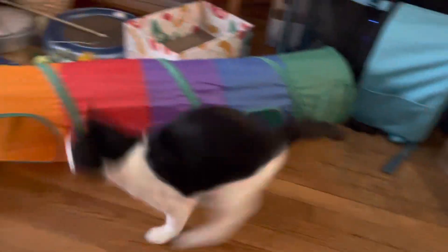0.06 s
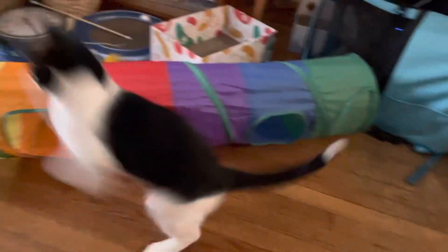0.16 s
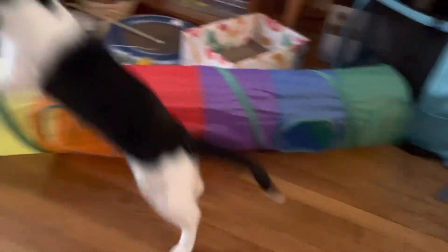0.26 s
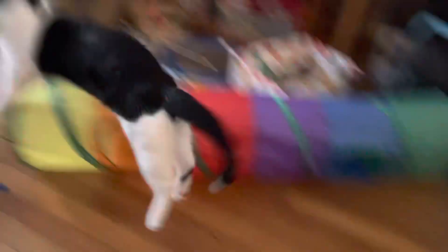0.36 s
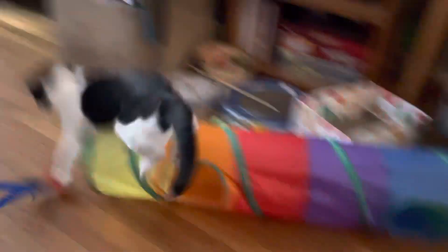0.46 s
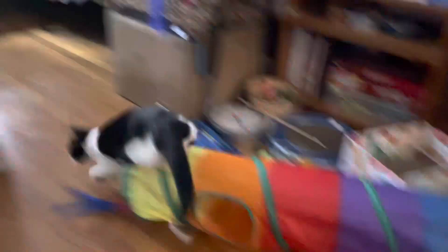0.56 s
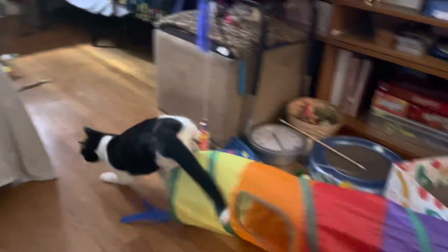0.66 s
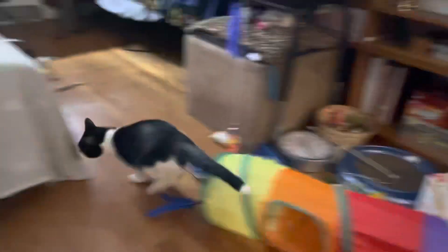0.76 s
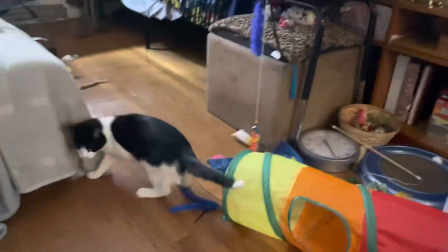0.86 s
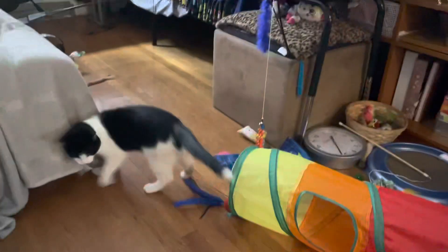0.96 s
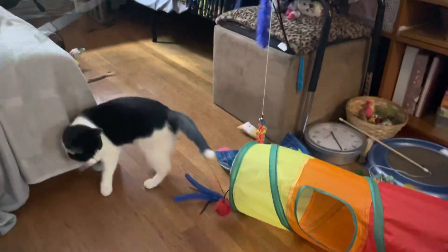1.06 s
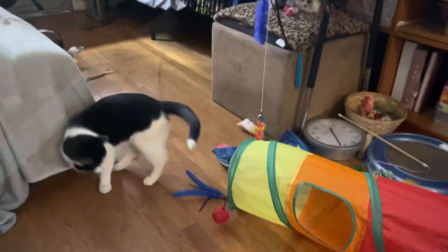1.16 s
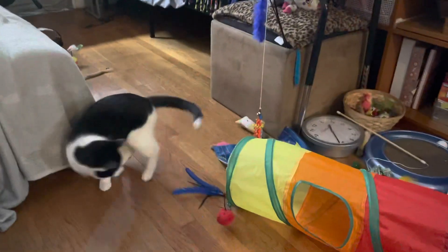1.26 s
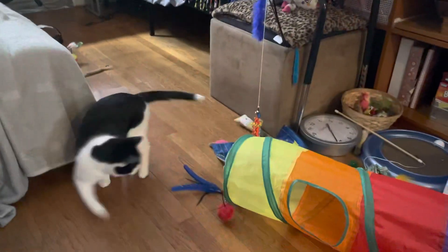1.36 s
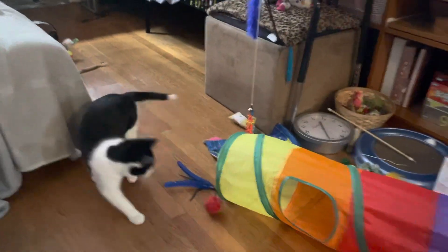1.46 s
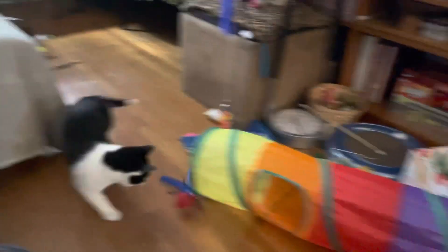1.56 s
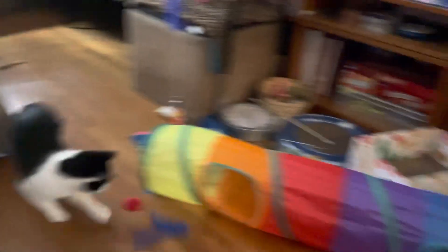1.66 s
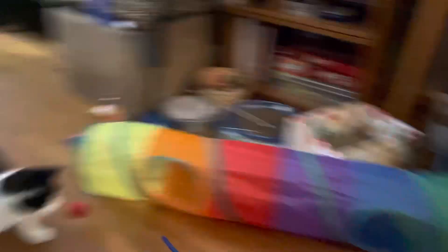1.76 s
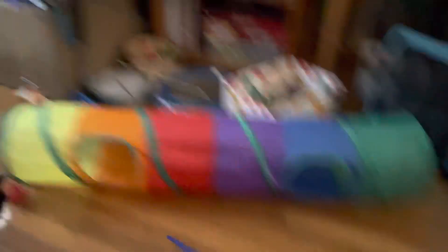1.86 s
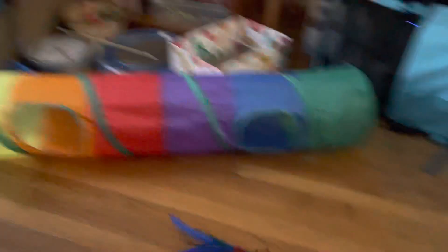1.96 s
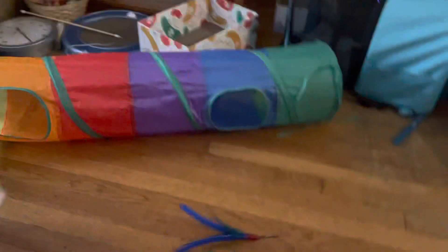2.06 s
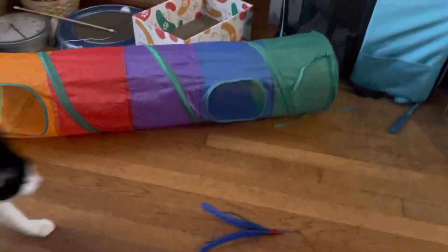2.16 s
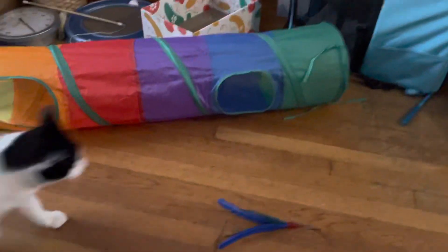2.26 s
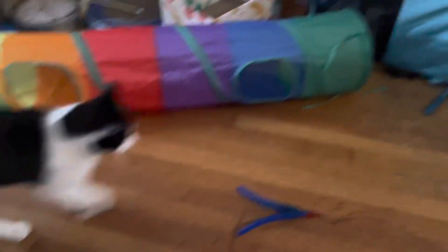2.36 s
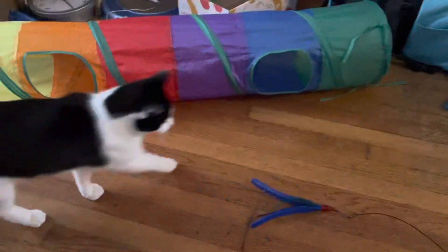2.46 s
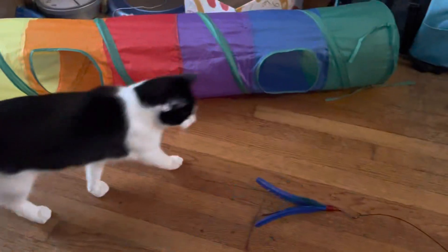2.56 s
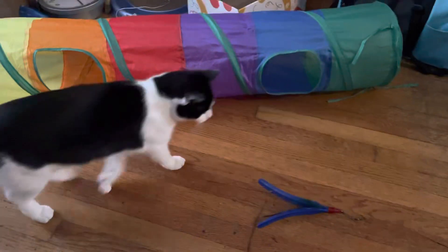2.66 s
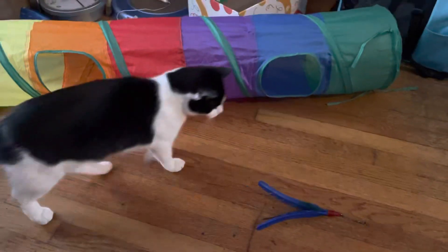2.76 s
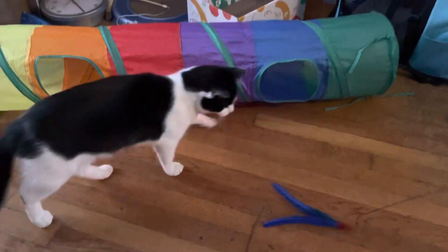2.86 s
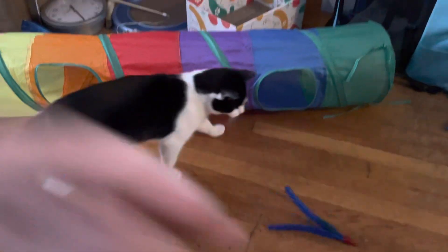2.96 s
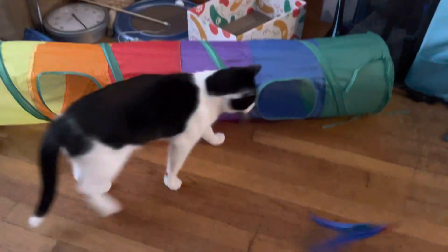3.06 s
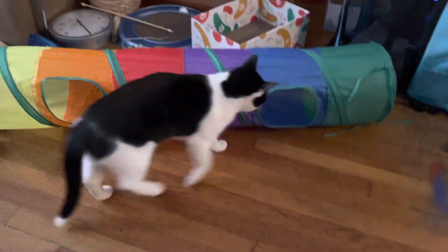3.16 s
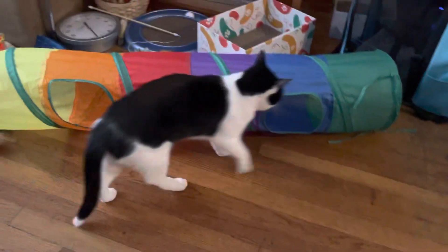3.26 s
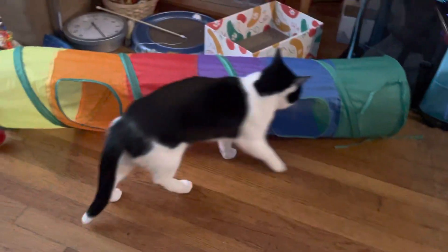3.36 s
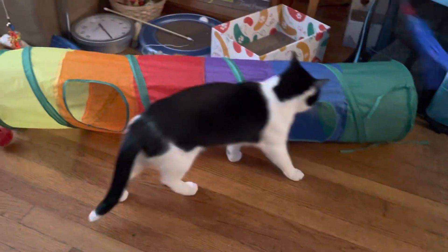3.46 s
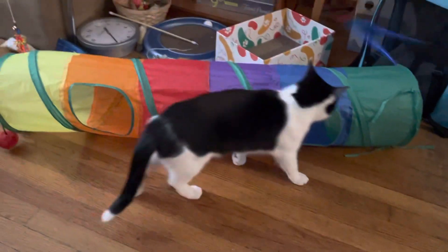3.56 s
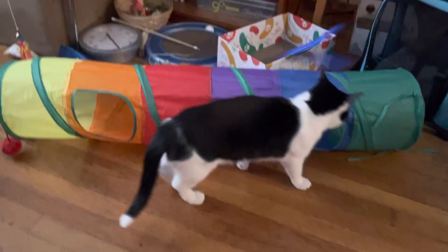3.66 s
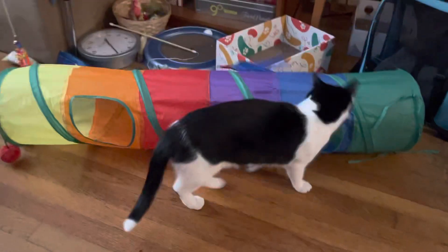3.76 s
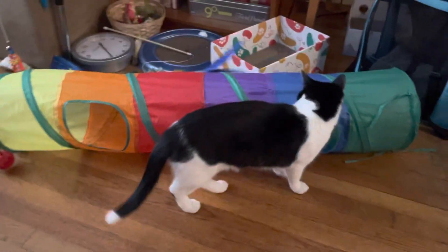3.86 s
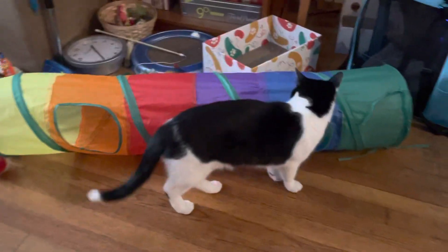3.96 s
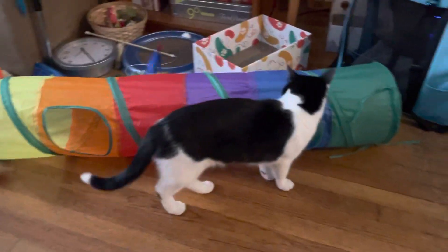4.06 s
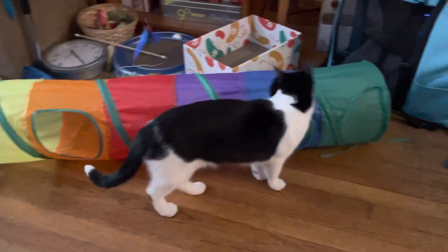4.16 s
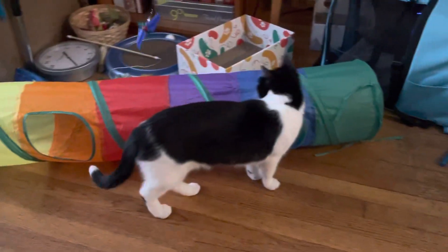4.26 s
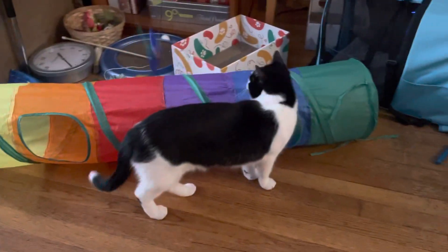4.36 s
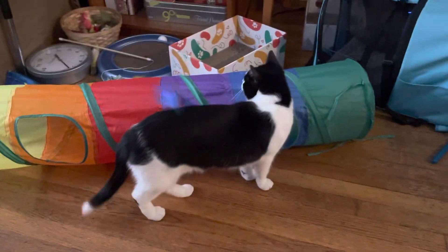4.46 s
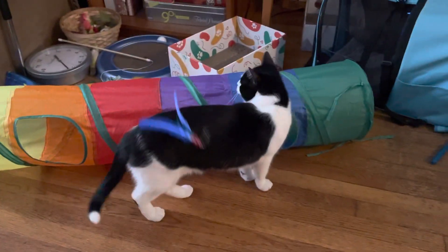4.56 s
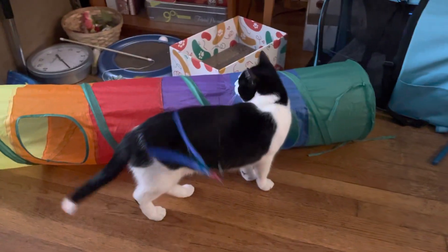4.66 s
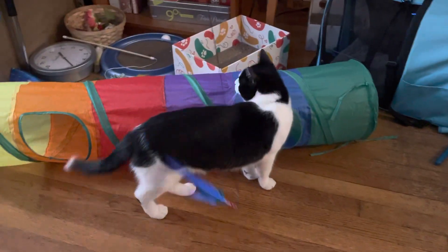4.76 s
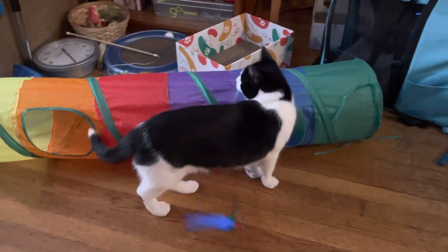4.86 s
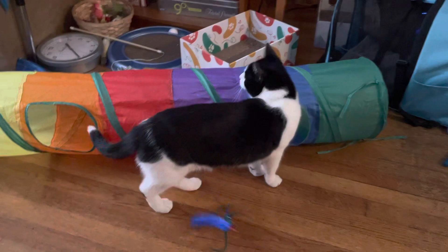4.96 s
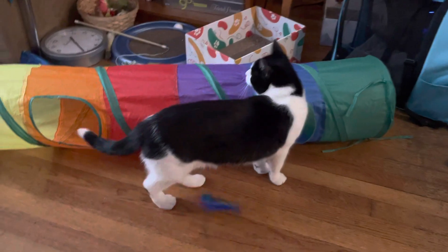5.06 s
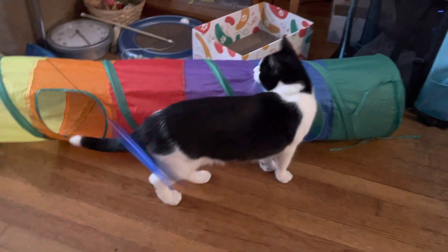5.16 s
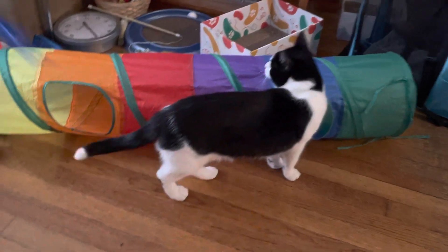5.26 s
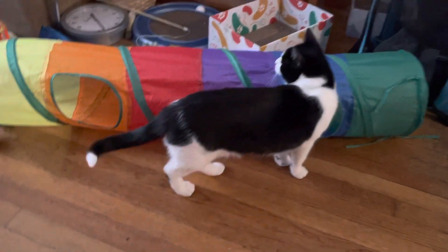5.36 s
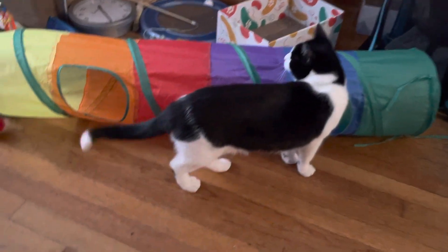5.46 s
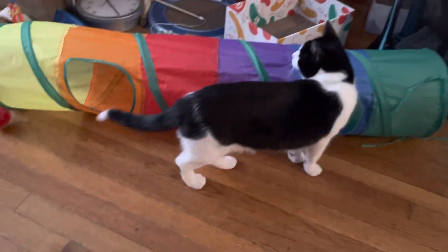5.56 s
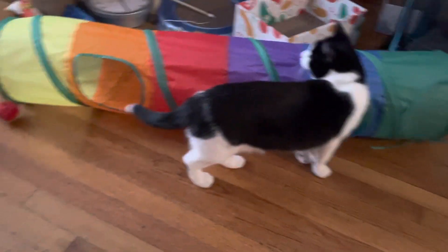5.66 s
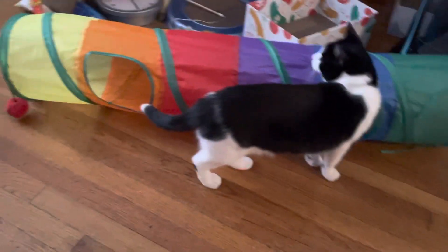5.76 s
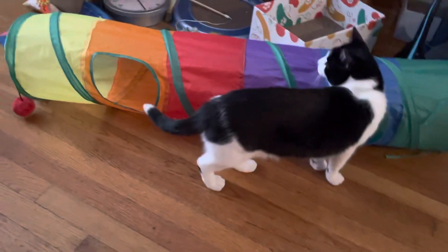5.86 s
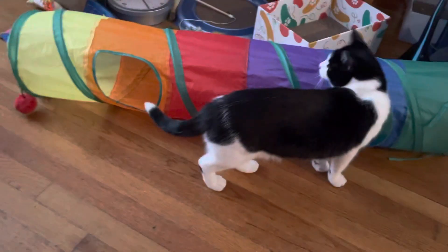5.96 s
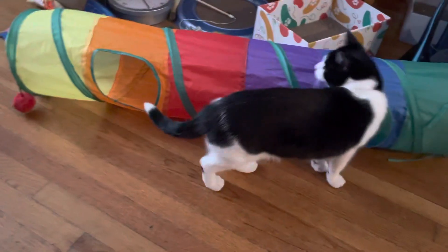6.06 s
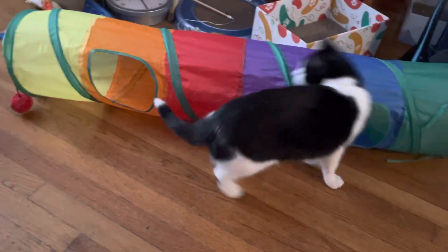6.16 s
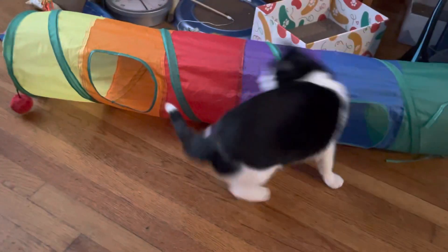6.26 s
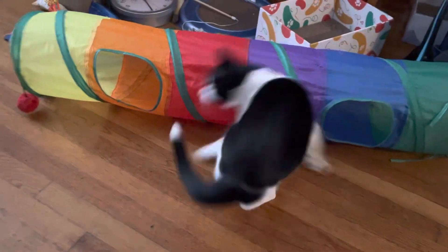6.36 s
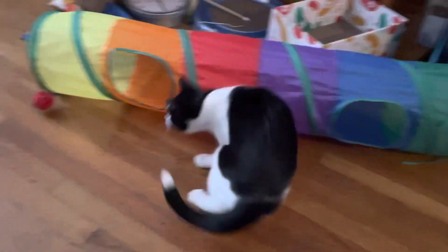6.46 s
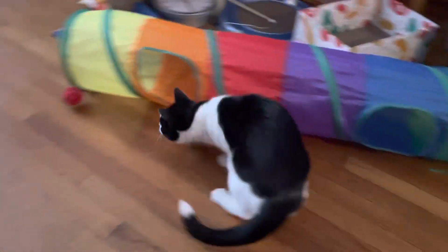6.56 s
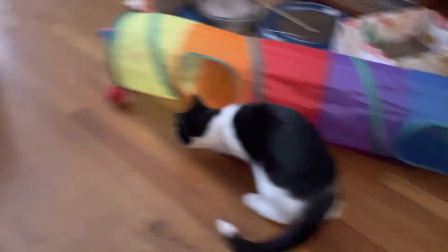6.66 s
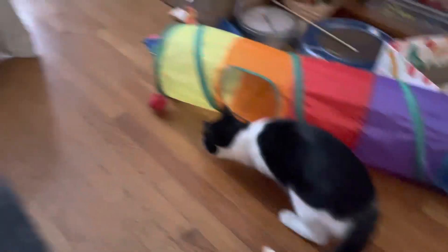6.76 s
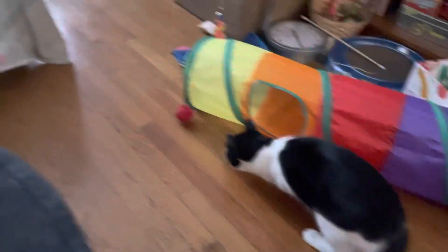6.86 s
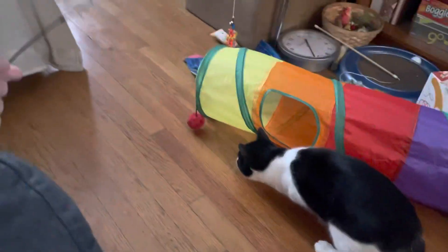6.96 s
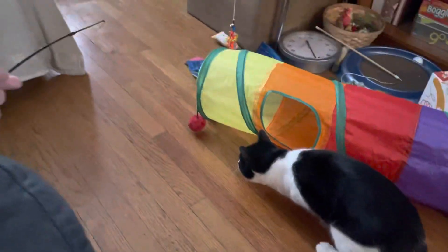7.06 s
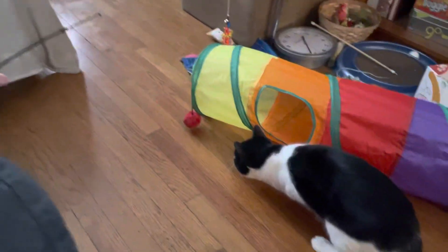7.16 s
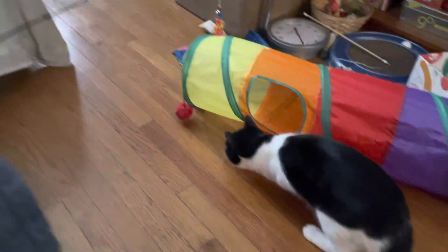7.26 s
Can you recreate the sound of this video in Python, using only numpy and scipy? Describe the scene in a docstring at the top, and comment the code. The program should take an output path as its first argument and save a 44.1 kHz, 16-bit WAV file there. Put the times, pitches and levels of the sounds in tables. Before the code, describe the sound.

A cat scampers and pounces on a hardwood floor, with sharp claw clicks, soft paw thumps and faint swishes.

```python
"""Sharp ticks and soft thumps on a hardwood floor: a cat trots and pounces after a flicked feather toy.
Claws and toy ring briefly on the boards and skid; padded paws push the boards, which ring and rattle.
Fur, feathers and a nylon play tunnel scuff and swish. A low room hum lies underneath.
Heard close; some treble bands sound wide and cancel in the centre."""
import sys
import numpy as np
from scipy import signal
from scipy.fft import rfft, irfft, next_fast_len
from scipy.io import wavfile
from scipy.ndimage import uniform_filter1d

SR = 44100
rng = np.random.default_rng(int(sys.argv[2]) if len(sys.argv) > 2 else 0)


def unload_audio(sound):
    """Save the sound as a 16-bit wav file, at the path given as the first command line argument."""
    columns = np.transpose(np.atleast_2d(sound))
    # keep every value between -1 and 1, then stretch to whole-number steps
    steps = np.round(np.clip(columns, -1, 1) * 32767)
    wavfile.write(sys.argv[1], SR, steps.astype(np.int16))


N = 322812

# claw and toy hits: start_s, level_db, low_note_hz, upper_re_low_db, knock_re_tip_db, skid_db, skid_t60_s
TICKS = [(0.125, -42, 2080, -11, -7, -52, 0.2), (0.203, -45, 2070, 6, -18, -60, .14),
         (0.2608, -32, 2300, 6.5, -10, -53, 0.28), (0.49, -15.5, 2370, -27, -6, -33.5, 0.4),
         (0.5834, -22, 2620, -32, -8.5, -44, 0.31), (0.621, -46, 2180, 16, -7, -42, 1),
         (0.6848, -33.5, 1440, -6, 8, -41, 0.29), (0.6875, -37.5, 1450, -2, -3, -60, 0.092),
         (0.8802, -39, 1540, -9.5, 7.5, -40, 0.13), (0.9014, -36, 1850, -7, 1, -61, 0.23),
         (0.9715, -47, 2290, 1, 4, -60, .05), (1.0114, -50, 1820, 0, 5.5, -78, .05),
         (1.15, -52.5, 2220, -7, 11, -71, 0.46), (1.173, -63, 2620, -2.5, 15, -55.5, 0.15),
         (1.2103, -63, 1890, 10, 19, -66, 0.61), (1.29, -33.5, 3400, 27, -5.5, -53.5, 0.14),
         (1.3457, -55.5, 2400, -3.5, 13, -51.5, 0.19), (1.4952, -26, 2650, -2.5, -2, -43, 0.2),
         (1.712, -56, 2700, 0, 13, -47.5, 0.021), (1.7573, -26.5, 3000, 9, 12.5, -33.5, 0.047),
         (1.7596, -21, 1602, 1, -4.5, -32.5, 0.28), (1.802, -48, 3207, 12, -15, -50, 0.05),
         (1.844, -36, 2110, 5, -3, -52, 0.54), (2.0219, -57.5, 1830, -1, 24.5, -55, 0.96),
         (2.068, -36.5, 3240, 9.5, -10, -73, 0.027), (2.2458, -45.5, 2250, 2.5, -6, -65, 0.65),
         (2.3177, -45.5, 2190, 2, 1.5, -62, 0.23), (2.354, -37.5, 3410, 25, -24, -54.5, 0.037),
         (2.724, -59, 2160, -3, -3, -83, 0.034), (2.7818, -28.5, 2340, 2, -26, -47, 0.039),
         (2.917, -61.5, 1920, 1, 32, -78, 0.17), (2.9309, -61, 1960, -6, 20, -50.5, 0.3),
         (2.98, -55, 1900, 1.5, 13, -68, .04), (3.014, -52, 2680, 18.5, 5, -64, 0.07),
         (3.7207, -59.5, 1690, -3.5, 19, -51, 0.37), (3.747, -51, 1660, -7, 9.5, -50, 0.22),
         (3.7525, -40, 1530, -9, 1.5, -57, 0.16), (3.7565, -49, 1400, -6.5, 12, -69, 0.12),
         (4.0537, -68, 1736, 8, -7.5, -67.5, .15), (4.8615, -28.5, 2130, -3, -2.5, -34.5, 0.037),
         (4.8714, -26, 2860, 8.5, -20.5, -45.5, 0.19), (4.916, -46, 2420, -5.5, 3.5, -48.5, 0.041),
         (4.9217, -39.5, 2570, 17, -12.5, -58, 0.077), (4.973, -48, 2080, 19, 5, -59, 0.079),
         (6.0376, -31, 3650, -11, 1, -50, 0.079), (6.041, -28, 3750, -2, -5.5, -38.5, 0.39),
         (6.047, -57, 3500, -11.5, 11, -38, 0.1), (6.1316, -55, 1420, -14, 19.5, -52, 0.34),
         (6.146, -39, 2120, 14, -15, -64, 0.06), (6.1543, -26.5, 2220, 9, -9, -59, 0.32),
         (6.5685, -25.5, 2460, -1.5, -22, -44.5, 0.31), (6.571, -32.5, 2400, 1, -2.5, -64, .03),
         (6.609, -37, 2340, -3, -5, -67, .08), (6.6234, -47, 2170, -8.5, -14, -73, .04)]
# paw landings: start_s, level_db, pitch_hz, t60_s
LANDINGS = [(0.129, -38.5, 288, 0.062), (0.143, -24, 115, 0.034), (0.191, -45, 123, 0.05),
            (0.236, -44, 143, 0.034), (0.371, -40, 162, 0.032), (0.427, -45, 204, 0.05),
            (0.499, -32, 368, 0.067), (0.5127, -17.5, 189.4, 0.044), (0.537, -28.5, 84, 0.036),
            (0.692, -33.5, 217, 0.043), (0.702, -33, 65, 0.033), (0.795, -37.5, 182, 0.16),
            (0.87, -37, 85, 0.06), (0.891, -39.5, 224, 0.053), (1.494, -44, 321, 0.058),
            (1.765, -38, 212, 0.097), (1.8, -32.5, 88, 0.054), (1.913, -35.5, 242.7, 0.074),
            (2.157, -40, 168, 0.054), (2.924, -43, 319, 0.023), (3.76, -34, 209, 0.027),
            (4.87, -44.5, 290, 0.018), (6.048, -38.5, 187, 0.075), (6.084, -40, 192, 0.04),
            (6.138, -41, 282, 0.052), (6.374, -41.5, 207, 0.11), (6.407, -44, 246, 0.11)]
# floorboard modes: mode_hz, gain_db, t60_s
BOARD_MODES = [(102.6, -18.5, 0.36), (151.3, -9, 0.33), (195, -9, 0.021), (263, -9, 0.22),
               (340, -19, 0.088), (434, -21.5, 0.051)]
# slow rubbing of fur, feathers and nylon: time_s, level_db
SCUFF_ENVELOPE = [(0.0, -69.5), (0.22, -86), (0.474, -44), (0.59, -56.5), (0.675, -42), (0.7, -41.5),
                  (0.77, -56.5), (0.98, -63), (1.26, -104), (1.62, -60), (1.94, -57), (2.2, -71.5),
                  (2.36, -67), (2.42, -93), (2.9, -77), (3.3, -94.5), (3.7, -88), (4.4, -89.5),
                  (5.95, -85.5), (6.22, -77), (6.73, -67), (7.05, -76.5), (7.32, -104)]
# feather and nylon swishes: centre_s, level_db, half_length_s, airy_band_hz
SWISHES = [(0.114, -68.5, 0.081, 3985), (0.224, -57.5, 0.027, 4494), (0.406, -52.5, 0.023, 3566),
           (0.761, -42.5, 0.022, 4750), (0.972, -67, 0.0081, 4500), (1.531, -44, 0.027, 4500),
           (1.611, -54.5, 0.014, 4500), (1.655, -55, 0.0063, 3500), (2.06, -62, 0.066, 4910),
           (3.058, -67, 0.0085, 4504), (3.195, -81.5, 0.13, 3500), (3.481, -82, 0.048, 3600),
           (3.557, -81, 0.012, 4800), (4.072, -66, 0.019, 3870), (4.499, -80, 0.015, 3200),
           (4.529, -75, 0.013, 5055), (4.6, -71.5, 0.023, 5405), (4.682, -78.5, 0.021, 3787),
           (5.001, -66.5, 0.029, 4073), (5.176, -69.5, 0.02, 4483), (5.307, -82, 0.01, 4480),
           (6.34, -71.5, 0.075, 4425), (6.836, -71, 0.051, 4140)]
# rubbing spectrum: freq_hz, density_db
RUB_SPECTRUM = [(150, -6.5), (400, 7), (1000, -2), (2000, -4.5), (3500, -6), (6000, -5.5), (8500, -9.5),
                (12000, -11.5), (15500, -18)]
# room hum spectrum: freq_hz, density_db
HUM_SPECTRUM = [(20, -64.5), (28, -47.5), (34, -20), (40, -9.5), (60, 5), (120, -2), (185, -4.5), (300, -7),
                (500, -17), (900, -17), (1500, -29), (2500, -37), (5000, -50.5), (10000, -60.5),
                (16000, -66.5)]
# wavering notes in the hum: pitch_hz, width_hz, level_db
HUM_TONES = [(178.3, 22, -62.5), (348.6, 9.6, -77.5), (506.7, 14, -71), (2620, 170, -88.5)]
# room decay: freq_hz, t60_s
ROOM_DECAY = [(200, 0.85), (600, 0.28), (1500, 0.033), (4000, 0.24), (10000, 0.11)]
# stereo phase: freq_hz, left_lead_rad
STEREO_PHASE = [(300, 0), (700, -.4), (2000, 0), (4800, 0), (5800, 1.2), (7100, 3.05), (8200, 3.25),
                (9300, 5), (10400, 6.25), (11600, 6.35), (12600, 7.6), (13700, 9.4), (14900, 9.5),
                (15700, 10), (16800, 10.6)]
# left/right likeness: freq_hz, coherence
STEREO_LIKENESS = [(60, .99), (150, .99), (300, .65), (700, .45), (1200, .68), (2000, .78), (3300, .4),
                   (4300, .4), (5200, .8), (6300, .8), (7000, .998), (8300, .998), (9500, .7),
                   (10600, .995), (11500, .99), (12500, .6), (13500, .998)]


def ticks(rub):
    """A hard tip rings on a low, an upper and a fainter top note over a knock and an edge, then skids."""
    size = 16384
    upper_ratio, top_ratio = 1.8, 2.8
    knock_hz, body_hz, knock_cutoff_hz, edge_hz = 800, 336.5, 2300, 6600
    skid_low_hz, skid_high_hz, scrape_db, scrape_s = 690, 9700, 2, 0.0022
    tips, skids = np.zeros(N), np.zeros((2, N))
    hz, t = np.fft.rfftfreq(size, 1 / SR) + 1, np.arange(size) / SR
    rattles = rng.standard_normal((len(TICKS), size)) * np.exp(-t / 0.0012)
    # bending waves bring the lows later: 2.2 cycles of delay at every pitch, plus 1 ms
    dispersion = np.exp(-2j * np.pi * (2.2 * np.log(hz / 20000) + hz * .001))
    bounce = 1 + 0.1 * np.exp(-2j * np.pi * hz * 0.00057)  # the tip touches twice
    skid_band = 0.9 / (1 + (hz / skid_high_hz) ** 2 + (skid_low_hz / hz) ** 2)

    def ring(centre_hz, width_oct, q):
        window = np.exp(-.5 * (np.log2(hz / centre_hz) / width_oct) ** 2)
        return window / (1 + 1j * q * (hz / centre_hz - centre_hz / hz))

    for (start_s, level_db, low_hz, upper_db, knock_db, skid_db, t60_s), rattle in zip(TICKS, rattles):
        upper_notes = ring(upper_ratio * low_hz, .6, 10) - .35 * ring(top_ratio * low_hz, .6, 12)
        notes = ring(low_hz, .4, 8) - amp(upper_db) * upper_notes
        loudest = amp(max(upper_db, 0))
        knock = ring(knock_hz, 0.81, 0.46) + amp(-10.5) * ring(body_hz, 0.25, 1.0)
        knock *= loudest * amp(knock_db) / (1 + (hz / knock_cutoff_hz) ** 4)
        edge_db = skid_db - level_db + 7.5 + 3 * min(upper_db, 0)
        edge = loudest * amp(edge_db) * ring(edge_hz, 0.61, .3) * rfft(rattle) / np.linalg.norm(rattle)
        tick = irfft((notes * bounce + knock + edge) * dispersion)[:size // 4]
        notes_peak = abs(irfft(notes * dispersion)).max()
        add(tips, start_s - .001, amp(level_db) / notes_peak * tick)

        slide = amp(skid_db - 60 * t / t60_s) * (1 - np.exp(-t / 0.0015))
        scrape = 1 + amp(scrape_db) * np.exp(-t / scrape_s)
        stroke = np.take(rub, round(start_s * SR) + np.arange(size), axis=1, mode="wrap") * slide * scrape
        add(skids, start_s, irfft(rfft(stroke) * (skid_band + 0.81 * abs(notes / loudest) ** 2)))
    return tips, skids


def paw_thumps():
    """A soft pad pushes the boards for a few cycles; they ring in their modes and rattle briefly."""
    rise_s, rattle_t60_s, rattle_band_hz = 0.01463, 0.081, [280, 620]
    out, t = np.zeros(N), np.arange(SR // 3) / SR
    boards = sum(amp(db - 60 * t / t60_s) * np.sin(2 * np.pi * hz * t) for hz, db, t60_s in BOARD_MODES)
    contact_s = np.maximum(t - 0.076 * rise_s, 0)
    rattle_envelope = (1 - np.exp(-contact_s / 0.003)) * amp(-60 * contact_s / rattle_t60_s)
    warped_s = t + 0.00623 * (1 - np.exp(-t / 0.0043))  # higher waves arrive first
    roughness = rng.standard_normal((len(LANDINGS), len(t)))
    rattles = unit_rms(butter(roughness[:, ::-1], 3, rattle_band_hz, "band"))
    for (start_s, level_db, pitch_hz, t60_s), rough, rattle in zip(LANDINGS, roughness, rattles):
        weight = (1 - np.exp(-t / rise_s)) ** 3 * amp(-60 * t / max(t60_s, .02))
        push = weight * np.sin(2 * np.pi * pitch_hz * warped_s)
        ringing = signal.fftconvolve(weight * rough, boards)[:len(t)]
        thump = push / abs(push).max() + 0.38 * ringing / abs(ringing).max()
        rattle_db = -3 - 100 * t60_s + 10.5 * np.log2(pitch_hz / 200)  # short, high landings rattle most
        thump += amp(rattle_db) * rattle * rattle_envelope
        add(out, start_s - 0.689 * rise_s, amp(level_db) * thump)  # touch precedes full weight
    return butter(out, 2, 40, "high")  # the thumps carry no deep bass


def rubbing():
    """Grainy friction noise at unit RMS: fibres catch and slip in sparse crinkles."""
    slips_per_s, slip_s = 250, 0.00169
    rub = unit_rms(patchy_noise(RUB_SPECTRUM, size=256, patchy_db=2.0))
    slips = amp(2.2 * np.minimum(rng.exponential(1, N), 3.5)) * (rng.random(N) < slips_per_s / SR)
    crinkles = signal.lfilter([1], [1, -np.exp(-1 / (slip_s * SR))], slips)
    return rub * unit_rms(1 + 0.42 * crinkles)


def scuff(rub):
    """Fur, feathers and nylon rub in slow strokes and brief swishes with a drifting airy band."""
    airy_width_hz, airy_gain = 2300, 0.68
    t = np.arange(N) / SR
    strokes = rub * amp(np.interp(t, *np.transpose(SCUFF_ENVELOPE)))
    power = sum(amp(2 * db) * np.exp(-((t - at_s) / half_s) ** 4) for at_s, db, half_s, _ in SWISHES)
    centre_s, _, _, band_hz = np.transpose(SWISHES)
    carrier = np.exp(2j * np.pi * np.cumsum(np.interp(t, centre_s, band_hz)) / SR)
    pole = np.exp(-np.pi * airy_width_hz / SR)
    airy = (carrier * signal.lfilter([1 - pole], [1, -pole], rub[::-1] / carrier)).real
    swish = unit_rms(rub[::-1] + airy_gain * unit_rms(airy))
    return strokes + swish * np.sqrt(power)


def room_hum(wash_db=-53.5):
    """A low wash with a few unsteady notes of narrow-band noise."""
    out = amp(wash_db) * unit_rms(patchy_noise(HUM_SPECTRUM, size=2048, patchy_db=0.25))
    for pitch_hz, width_hz, level_db in HUM_TONES:
        pole = np.exp(-np.pi * width_hz / SR)
        resonator = [1, -2 * pole * np.cos(2 * np.pi * pitch_hz / SR), pole * pole]
        out += amp(level_db) * unit_rms(signal.lfilter([1], resonator, rng.standard_normal((2, N))))
    return out


def room(x, direct, wet_db):
    """Row 0 direct, row 1 scattered over 3 ms; both with sparse echoes that die band by band."""
    taps = np.zeros((2, SR // 2))
    at = np.arange(120, SR // 2 - 20, 20) + rng.integers(0, 20, (2, (SR // 2 - 121) // 20))
    np.put_along_axis(taps, at, rng.choice([-1., 1.], at.shape), 1)
    hz, t, spectra = signal.stft(taps, SR, nperseg=256)
    response = signal.istft(spectra * amp(-60 * t / curve(ROOM_DECAY, hz)[:, None]), SR, nperseg=256)[1]
    response *= amp(wet_db) / np.linalg.norm(response[0])
    scattered = rng.standard_normal(128) * np.exp(-np.arange(128) / 30)
    response[0, 0] += direct
    response[1, :128] += 1.7 * direct * scattered / np.linalg.norm(scattered)
    return signal.fftconvolve(x[None], response, axes=1)[:, :N]


def patchy_noise(spectrum, size, patchy_db):
    """Two unrelated noises of one spectrum, with drifting louder and softer patches."""
    frames = N * 4 // size + 5
    real, imag, drift = rng.standard_normal((frames, size // 2 + 1, 2, 3)).T
    patches = unit_rms(uniform_filter1d(uniform_filter1d(drift[0], 3, 0), 16, 1))
    hz = np.fft.rfftfreq(size, 1 / SR)[:, None]
    spectra = (real + 1j * imag) * amp(curve(spectrum, hz) + patchy_db * patches)
    return signal.istft(spectra, nperseg=size, noverlap=size * 3 // 4)[1][:, :N]


def amp(db):
    return 10 ** (np.asarray(db) / 20)


def unit_rms(x):
    return x / np.sqrt(np.mean(x ** 2, -1, keepdims=True) + 1e-20)


def curve(points, hz):
    point_hz, value = np.transpose(points)
    return np.interp(np.log(hz + 1), np.log(point_hz + 1), value)


def butter(x, order, cutoff_hz, kind):
    return signal.lfilter(*signal.butter(order, cutoff_hz, kind, fs=SR), x)


def add(mix, start_s, sound):
    part = mix[..., round(start_s * SR):][..., :sound.shape[-1]]
    part += sound[..., :part.shape[-1]]


def scene():
    """Row 0: the sound left and right share. Row 1: an unrelated twin arriving by other paths."""
    rub = rubbing()
    tips, skids = ticks(np.roll(rub, SR, axis=1))
    slides = scuff(rub) + skids
    near = room(tips, direct=0.65, wet_db=-21)
    near += room(paw_thumps(), direct=0.8, wet_db=-16.0)
    near += slides + room(slides[0], direct=0, wet_db=-9.5)
    near[1] = butter(near[1], 1, 1300, "high")  # long waves from close by reach both sides alike
    return near + room_hum()


def record(dry):
    """Stereo phase and left/right likeness by frequency; the top treble is rolled off above 16.6 kHz."""
    cutoff_hz = 16600
    size = next_fast_len(N + 4096)
    hz = np.fft.rfftfreq(size, 1 / SR)
    shared, twin = rfft(dry, size)
    mix_rad = np.arccos(np.clip(curve(STEREO_LIKENESS, hz), -1, 1)) / 2
    half_lead = np.exp(.5j * curve(STEREO_PHASE, hz))
    left = (np.cos(mix_rad) * shared + np.sin(mix_rad) * twin) * half_lead
    right = (np.cos(mix_rad) * shared - np.sin(mix_rad) * twin) / half_lead
    stereo = irfft(np.array([left, right]), size)[:, :N]
    lowpass = signal.firwin(511, cutoff_hz, window=("kaiser", 9), fs=SR)
    return signal.oaconvolve(stereo, lowpass[None], "same")


dry = scene()
out = record(dry)
unload_audio(out)
```